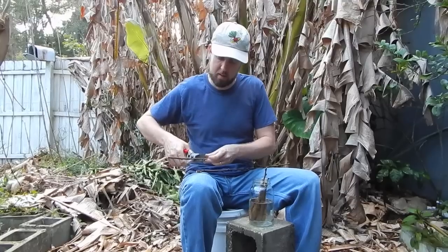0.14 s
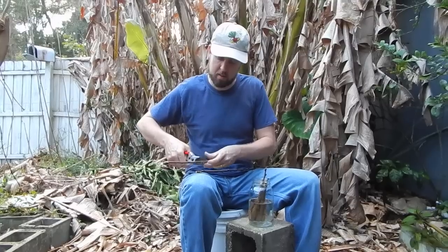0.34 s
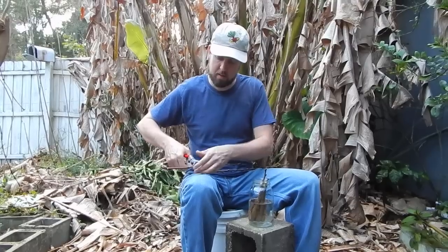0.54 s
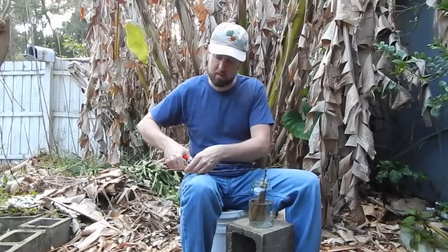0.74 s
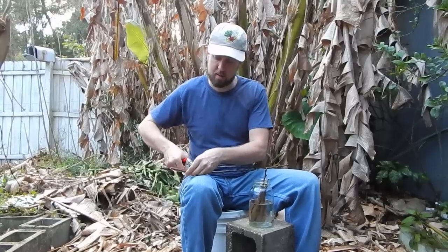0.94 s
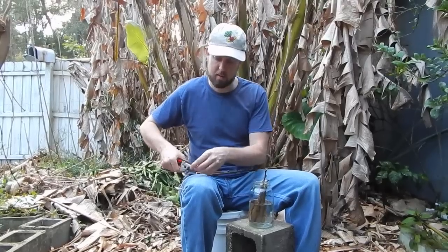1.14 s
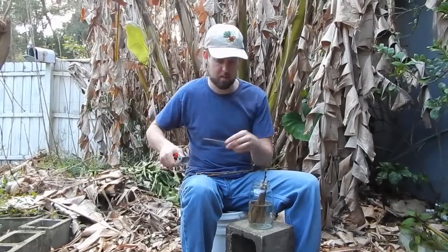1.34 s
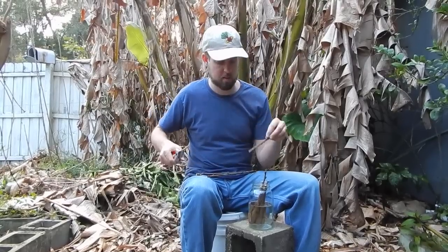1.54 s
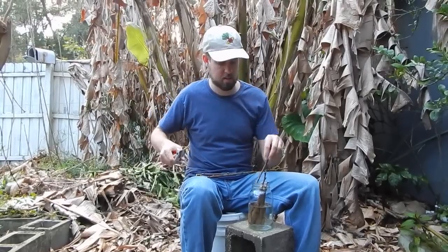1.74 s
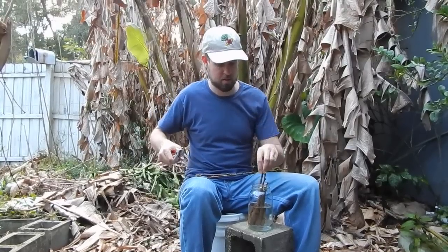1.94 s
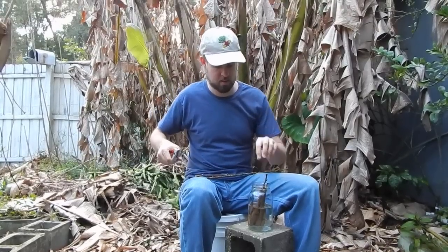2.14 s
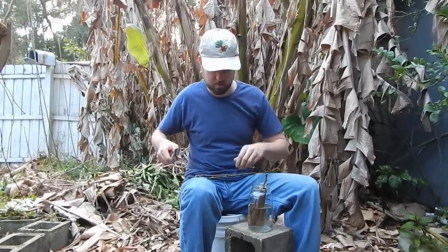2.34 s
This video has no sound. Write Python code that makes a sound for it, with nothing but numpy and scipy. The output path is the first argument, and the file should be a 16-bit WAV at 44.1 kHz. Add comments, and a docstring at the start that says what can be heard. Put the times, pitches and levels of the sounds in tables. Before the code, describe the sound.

Hand pruning shears snip once through a thin twig, outdoors over faint insect trill and distant rumble

```python
"""A small yard: close to the microphones, hand pruners cut a thin twig. The blade bites, the wood snaps,
and the steel jaws clack shut and ring. Then the cutting scrapes into a glass jar, and a dry tap falls near left.
Contacts are short bursts of coloured noise and decaying modes; a fence and plants answer with scattered noise.
Insects trill in the plants as pulsed narrow noise; far off, coloured noise makes the town rumble and the
air, and wavering sines a faint machine hum."""
import sys
import numpy as np
from scipy import signal
from scipy.fft import rfft, irfft, next_fast_len
from scipy.io import wavfile
from scipy.ndimage import map_coordinates

SR = 44100
rng = np.random.default_rng(int(sys.argv[2]) if len(sys.argv) > 2 else 0)


def int16_out(signal):
    """Quantize to a 16-bit WAV file."""
    q = np.round(np.clip(np.atleast_2d(signal).T, -1, 1) * 32767)
    wavfile.write(sys.argv[1], SR, q.astype(np.int16))


N = 104737

# blade biting into the bark: contacts (t/s, level/dB), colour (f/Hz, level/dB)
BITES = [(0.8976, -37), (0.903, -42), (.908, -39)]
BARK_COLOUR = [(400, -17), (1300, -7), (1650, 12.5), (2200, 2.5), (2800, -3), (4700, -5), (6100, 2.5),
               (7500, -11), (11000, -0.5), (13000, -18), (15500, -19)]
# twig fibres breaking: contacts (t/s, level/dB), colour (f/Hz, level/dB)
FRACTURES = [(.963, -28), (.964, -25), (0.9646, -20.5), (0.967, -21)]
WOOD_COLOUR = [(150, -19), (400, 1), (900, -15), (1500, -2.5), (2000, -3), (2450, -15), (3050, 2.5),
               (4300, -5), (5000, -4.5), (5900, -3), (8000, 0.5), (11000, 0.5), (15500, -20)]
# modes of the twig as it parts (f/Hz, level/dB, t60/s)
TWIG_MODES = [(1436, -7.5, 0.038), (1927, 1, 0.063), (2080, 1.5, 0.03), (2940, 0.5, 0.033),
              (3200, -5, 0.018), (3705, -7, 0.066), (4240, -9.5, 0.064)]
# jaws slamming shut and chattering: contacts (t/s, level/dB), colour (f/Hz, level/dB)
CLACKS = [(0.9677, -10), (0.9693, -12.5), (0.9719, -21.5), (0.974, -20)]
STEEL_COLOUR = [(300, -10.5), (1000, -27), (2500, -17.5), (4600, -19), (6200, 2), (6900, -5), (8200, 5),
                (9600, -9), (11000, -11), (15500, -22)]
# modes of the steel shears, and low thud of the handles (f/Hz, level/dB, t60/s)
SHEARS_MODES = [(5520, -4, .06), (5700, -4, .05), (5936, -5, .06), (6342, 0, .07), (6596, -7, .06),
                (7348, -5, .07), (8052, 2, .05), (8240, 3, .05), (8570, 0, .065), (8740, -1, .065),
                (9475, -5, .06), (10650, -6, .045)]
HANDLE_MODES = [(293, -2, 0.065), (427, 0, 0.045), (537, 2.5, 0.034)]
# light ticks of handled blade and twig: contacts (t/s, level/dB, t60/s), colour (f/Hz, level/dB)
TICKS = [(0.1308, -47.5, 0.058), (0.191, -39, 0.042), (.26, -55, 0.088), (.485, -61, .1), (.815, -60, .08),
         (1.785, -61, .08), (1.841, -57.5, .08), (2.009, -52, 0.077), (2.152, -57, 0.072)]
TICK_COLOUR = [(500, -38), (1700, -14), (2500, 1.5), (4300, -8.5), (5800, 3), (7500, -3), (10300, 2.5),
               (12500, -11), (15500, -24)]
# cutting scraping into the jar: contacts (t/s, level/dB), colour (f/Hz, level/dB)
SCRAPES = [(1.919, -56), (1.9291, -42), (1.953, -53), (2.0778, -60), (2.11, -70)]
SCRAPE_COLOUR = [(1000, -10), (3400, -9.5), (4400, -3), (6300, -2), (8000, -10), (10000, -16), (15000, -30)]
# modes of the glass jar (f/Hz, level/dB, t60/s)
JAR_MODES = [(2220, -2, 0.041), (3340, -1, .07), (3730, -9, .06)]
# sleeve and twig rustling: moves (centre t/s, half length/s, level/dB), colour (f/Hz, level/dB)
RUSTLES = [(0.13, 0.088, -62.5), (2.1, 0.19, -63.5)]
CLOTH_COLOUR = [(400, -27), (1200, 3), (2300, 5.5), (5000, -6.5), (10000, -3.5), (15000, -21)]
# dry tap: dull body modes (f/Hz, level/dB, t60/s), colour of its crack (f/Hz, level/dB)
TAP_MODES = [(430, 0.5, 0.0095), (1100, -0.5, 0.0087), (1700, -5, 0.013), (2120, -2, 0.0077),
             (2860, -1, 0.0067), (4400, -11, 0.0044)]
TAP_COLOUR = [(100, -1), (1500, -9), (3100, 4), (5500, -15), (11000, -15), (15000, -36)]
# decay of the yard's tail (f/Hz, t60/s)
YARD_DECAY = [(200, 0.048), (2000, 0.23), (7000, 0.19), (15000, 0.28)]
# insects (end of song t/s, centre f/Hz, width/Hz, pulse rate/Hz, pulse depth/dB, level/dB, left-right/dB)
INSECTS = [(1.7, 7100, 140, 88, 2.5, -62.5, 9), (1.7, 6640, 130, 58, -3, -69, 4),
           (3, 7966, 180, 46, 0.5, -58, 5), (3, 8430, 100, 58, 0, -60.5, 3),
           (3, 7440, 500, 60, -7, -63.5, 5)]
# colours of town rumble and open air (f/Hz, level/dB)
RUMBLE_COLOUR = [(15, -30), (25, -16), (45, -4.5), (60, -3.5), (85, -1), (118, -1), (150, -6), (200, -11.5),
                 (240, -11.5), (290, -21.5), (450, -36.5), (900, -62.5)]
AIR_COLOUR = [(100, -16), (300, -1.5), (480, -2), (620, -5.5), (850, -3), (1300, -10.5), (2200, -15.5),
              (4000, -21), (6000, -24.5), (9000, -25.5), (12000, -33), (15500, -36)]
# likeness of the two microphones in the background (f/Hz, correlation)
BACKGROUND_ALIKE = [(50, 1), (150, 0.94), (300, 0.8), (600, 0.8), (1200, 0.51), (3000, 0.067),
                    (10000, 0.036)]
# machine hum (f/Hz, level/dB)
HUM = [(116, -51.5), (240, -58), (1301, -68), (1626, -73)]

ATTACK_S = .0002
DIRECT_ALIKE, DIRECT_PAN_DB = 0.59, 1  # nearby sound: microphone correlation; left over right
BITE_T60_S, FRACTURE_T60_S, CLACK_T60_S = 0.054, 0.018, 0.0078
TWIG_DB, SHEARS_DB, HANDLES_DB = -27.5, -28.5, -33.5
SCRAPE_T60_S, CLINK_S, CLINK_DB = 0.075, 2.189, -45
RUSTLE_GRAIN_DB = 4.5
TAP_S, TAP_T60_S, TAP_PAN_DB = 2.3357, 0.0077, 11
TAP_BODY_DB, TAP_CRACK_DB = -28.5, -31.5
EARLY_DB, EARLY_T60_S, EARLY_DELAY_S = -2.5, 0.093, 0.0036
YARD_DB, YARD_RISE_S = -8, 0.009
TRILL_DRIFT, TRILL_FLICKER_DB = 0.043, -1.4  # drift is a fraction of the pulse rate
RUMBLE_DB, AIR_DB, BACKGROUND_PAN_DB = -42, -50, 0.3
HUM_WAVER_RAD = 0.62
TOP_HZ = 15800


def amp(db):
    """Decibels to gain."""
    return 10 ** (np.asarray(db) / 20)


def unit(x):
    """Scaled to rms 1."""
    return x / np.sqrt(np.mean(x ** 2) + 1e-20)


def along(points, hz):
    """Interpolate (f/Hz, value) points on a log frequency axis."""
    f, v = np.transpose(points)
    return np.interp(np.log(hz + 1), np.log(f + 1), v)


def pan(db):
    """Left and right gains for a level difference, positive toward the left microphone."""
    return amp(np.array([[db], [-db]]) / 2)


def wobble(rate):
    """A smooth random curve, rate knots a second."""
    knots = rng.standard_normal(N // 100)
    coarse = np.arange(0, N, 16)
    curve = map_coordinates(knots, [coarse * rate / SR], mode="wrap")
    return np.interp(np.arange(N), coarse, curve)


def filtered(x, response):
    """x shaped by a response of frequency, in the spectrum."""
    n = x.shape[-1]
    m = next_fast_len(n + n // 16, True)
    spectrum = rfft(x, m) * response(np.fft.rfftfreq(m, 1 / SR))
    return irfft(spectrum, m)[..., :n]


def noise(colour, alike, size=N):
    """Coloured stereo noise of rms 1; alike is one correlation or (f/Hz, correlation) points."""
    def response(hz):
        likeness = along(alike, hz) if np.ndim(alike) else np.full_like(hz, alike)
        turn = np.arccos(np.clip(likeness, -1, 1)) / 2
        return amp(along(colour, hz)) * [np.cos(turn), np.sin(turn)]
    mid, side = filtered(rng.standard_normal((2, size)), response)
    return unit(np.array([mid + side, mid - side]))


def fade(t, t60):
    """Exponential decay, 60 dB down at t60."""
    return np.exp(-np.log(1000) * t / t60)


def strike(t60):
    """Envelope of a contact: sharp attack, then decay."""
    t = np.arange(SR // 6) / SR
    return (1 - np.exp(-t / ATTACK_S)) * fade(t, t60)


def place(s, x):
    """A short stereo sound starting at time s."""
    out, start = np.zeros((2, N)), round(s * SR)
    out[:, start:start + x.shape[1]] = x[:, :N - start]
    return out


def crack(s, db, t60, colour):
    """A contact too brief for a pitch: one short burst of coloured noise."""
    envelope = strike(t60)
    burst = envelope * noise(colour, DIRECT_ALIKE, size=len(envelope))
    return place(s, amp(db) * burst)


def ring(s, db, modes):
    """Modes struck at time s, each reaching the two microphones in its own phase."""
    out = 0
    for hz, level, t60 in modes:
        envelope = strike(t60)
        t = np.arange(len(envelope)) / SR
        phase = rng.uniform(0, 2 * np.pi) + .5 * rng.standard_normal((2, 1))
        out = out + amp(db + level) * envelope * np.sin(2 * np.pi * hz * t + phase)
    return place(s, out)


def snip():
    """Contacts of one cut: blade bites, fibres break, twig rings; jaws clack and ring, handles thud."""
    bite = sum(crack(s, db, BITE_T60_S, BARK_COLOUR) for s, db in BITES)
    snaps = [crack(s, db, FRACTURE_T60_S, WOOD_COLOUR) for s, db in FRACTURES]
    clacks = [crack(s, db, CLACK_T60_S, STEEL_COLOUR) for s, db in CLACKS]
    part_s = FRACTURES[2][0]  # the twig parts at the third fracture
    shut_s = CLACKS[0][0]
    twig = ring(part_s, TWIG_DB, TWIG_MODES)
    shears = ring(shut_s, SHEARS_DB, SHEARS_MODES)
    handles = ring(shut_s, HANDLES_DB, HANDLE_MODES)
    return [bite, *snaps, *clacks, twig + shears + handles]


def handling(tick_pan_db=-2.0, scrape_pan_db=5, scrape_grain_db=3):
    """Small ticks of twig and blade; the cutting scrapes into the jar and clinks on the glass."""
    ticks = sum(crack(s, db, t60, TICK_COLOUR) for s, db, t60 in TICKS)
    scrape = sum(crack(s, db, SCRAPE_T60_S, SCRAPE_COLOUR) for s, db in SCRAPES)
    grain = unit(amp(scrape_grain_db * wobble(300)))
    clink = ring(CLINK_S, CLINK_DB, JAR_MODES)
    return pan(tick_pan_db) * ticks + pan(scrape_pan_db) * scrape * grain + clink


def rustle():
    """Grainy friction that swells and fades with each move of the hands."""
    t = np.arange(N) / SR
    motion = sum(amp(db) * np.exp(-((t - s) / half) ** 2 / 2) for s, half, db in RUSTLES)
    grain = amp(RUSTLE_GRAIN_DB * wobble(90))
    return motion * unit(grain * noise(CLOTH_COLOUR, DIRECT_ALIKE))


def tap():
    """A dry crack and dull body near the left microphone, too close to raise an echo."""
    body = ring(TAP_S, TAP_BODY_DB, TAP_MODES)
    return pan(TAP_PAN_DB) * (body + crack(TAP_S, TAP_CRACK_DB, TAP_T60_S, TAP_COLOUR))


def yard(x):
    """Quick scatter from body and ground, and a tail from fence and plants; drawn anew at each call."""
    size = SR // 4
    hz, t, z = signal.stft(rng.standard_normal((2, size)), SR, nperseg=256)
    decay = fade(t, along(YARD_DECAY, hz)[:, None])
    tail = signal.istft(z * decay, SR, nperseg=256)[1]
    t = np.arange(tail.shape[1]) / SR
    tail = tail * np.clip(t / YARD_RISE_S, 0, 1) ** 2
    early = rng.standard_normal(tail.shape) * fade(t, EARLY_T60_S) * (t > EARLY_DELAY_S)
    # the root of the length turns rms levels into echo energy
    echo = (amp(EARLY_DB) * unit(early) + amp(YARD_DB) * unit(tail)) / np.sqrt(len(t))
    return signal.fftconvolve(x, echo, axes=1)[:, :N]


def insects(stop_s=0.015):
    """Each song is a narrow wing resonance, pulsed by the wing strokes."""
    t, out = np.arange(N) / SR, 0
    for end, hz, width, rate, depth_db, db, pan_db in INSECTS:
        wing = filtered(rng.standard_normal((2, N)), lambda f: np.exp(-((f - hz) / width) ** 2 / 2))
        drifting_rate = rate * (1 + TRILL_DRIFT * wobble(6.6))
        strokes = np.sin(2 * np.pi * np.cumsum(drifting_rate) / SR)
        flicker_db = TRILL_FLICKER_DB * wobble(45)
        song = unit(wing * amp(depth_db * strokes + flicker_db))
        out = out + amp(db) * pan(pan_db) * song * np.clip((end - t) / stop_s, 0, 1)
    return out


def machine_hum():
    """Steady tones, each wavering in phase, alike at both microphones."""
    t = np.arange(N) / SR
    return sum(amp(db) * np.sqrt(2) * np.sin(2 * np.pi * hz * t + HUM_WAVER_RAD * wobble(8))
               for hz, db in HUM)


def background(swell_db=.5):
    """Distant town rumble and gently swelling open air as coloured noise, with the machine hum."""
    rumble = amp(RUMBLE_DB) * noise(RUMBLE_COLOUR, BACKGROUND_ALIKE)
    air = amp(AIR_DB + swell_db * wobble(3.76)) * noise(AIR_COLOUR, BACKGROUND_ALIKE)
    return pan(BACKGROUND_PAN_DB) * (rumble + air + machine_hum())


def scene():
    """The work in its yard, over insects and background."""
    cut = sum(pan(DIRECT_PAN_DB) * contact + yard(contact) for contact in snip())
    hands = handling() + rustle()
    return cut + hands + yard(hands) + tap() + insects() + background()


def record(dry):
    """The recorder keeps nothing above its band limit."""
    return filtered(dry, lambda hz: hz < TOP_HZ)


dry = scene()
out = record(dry)
int16_out(out)
```